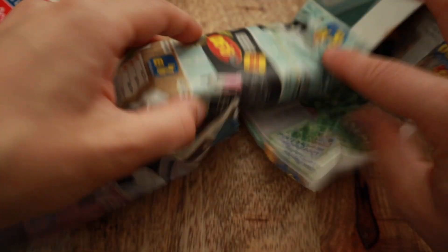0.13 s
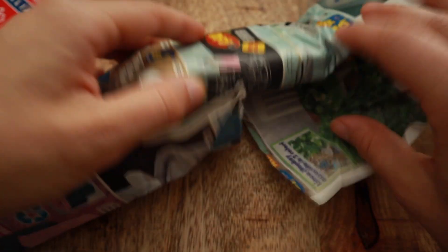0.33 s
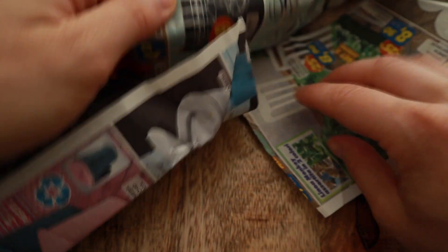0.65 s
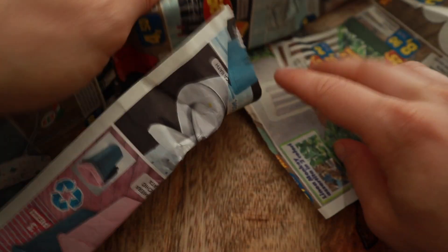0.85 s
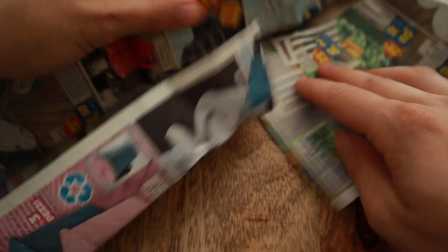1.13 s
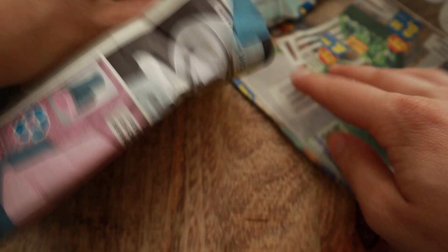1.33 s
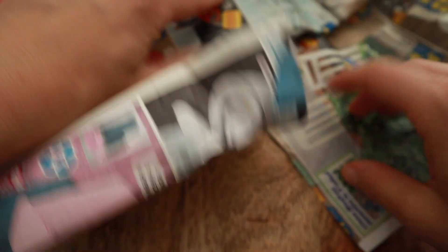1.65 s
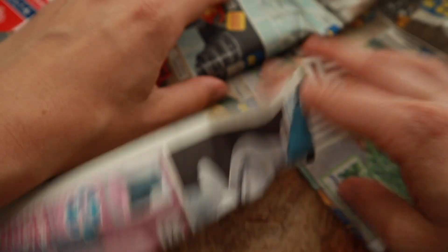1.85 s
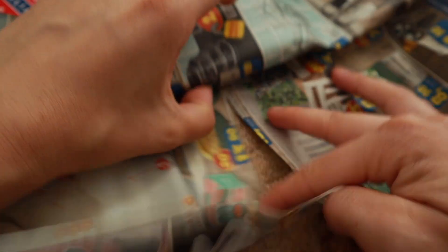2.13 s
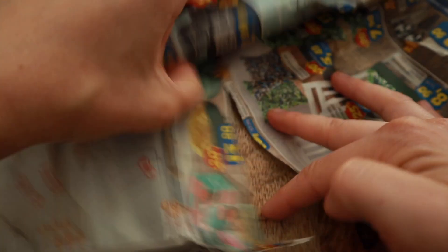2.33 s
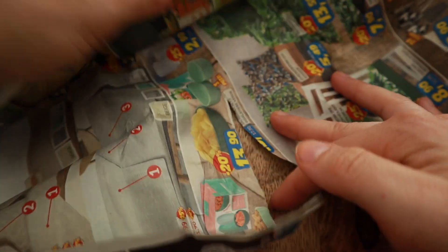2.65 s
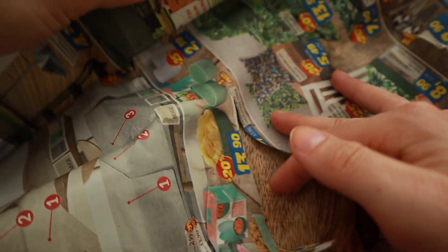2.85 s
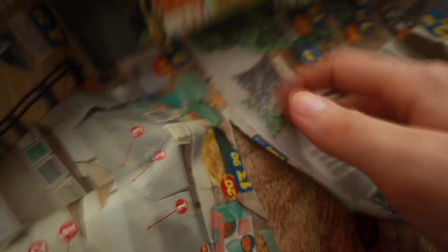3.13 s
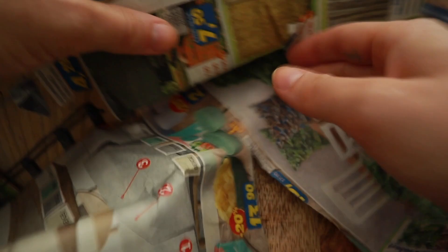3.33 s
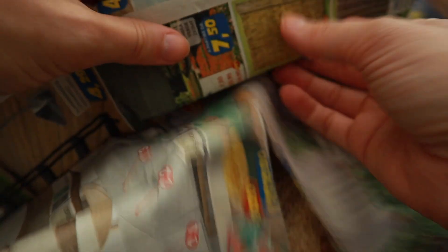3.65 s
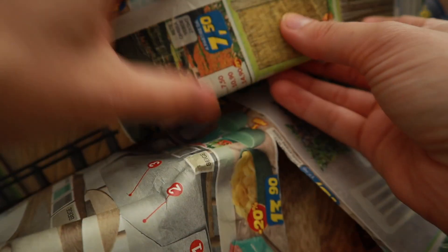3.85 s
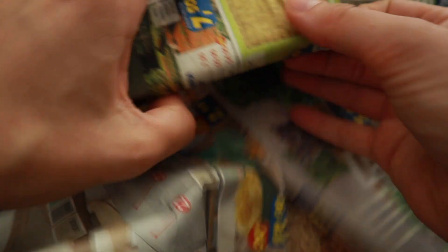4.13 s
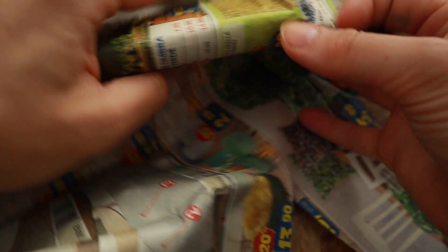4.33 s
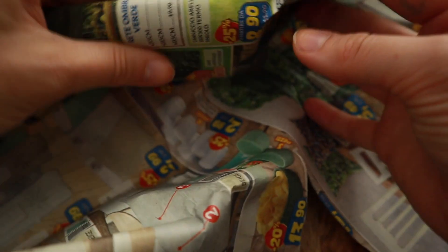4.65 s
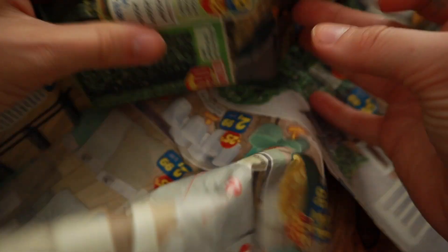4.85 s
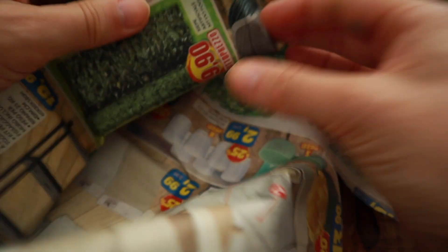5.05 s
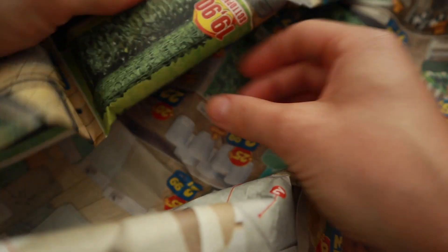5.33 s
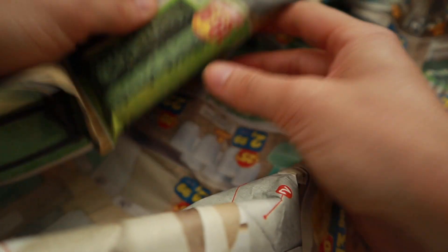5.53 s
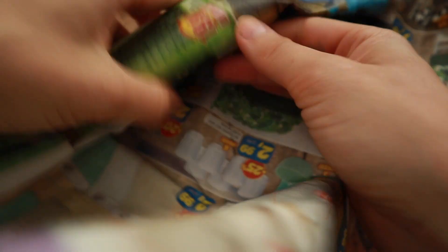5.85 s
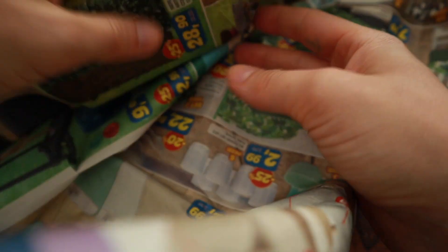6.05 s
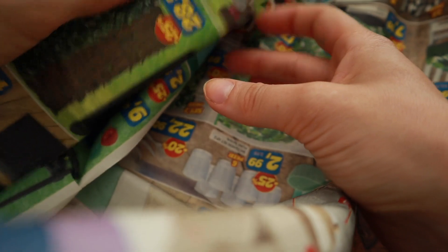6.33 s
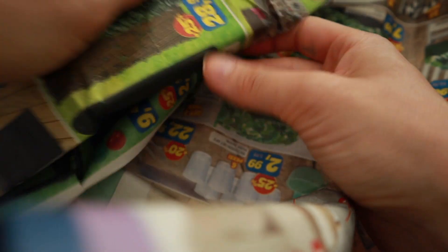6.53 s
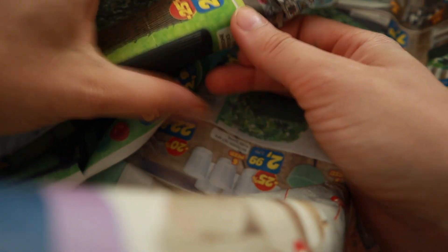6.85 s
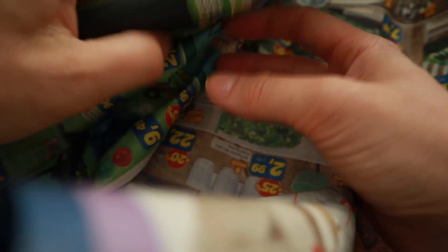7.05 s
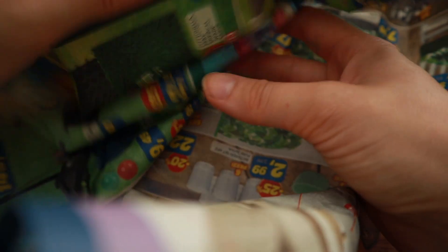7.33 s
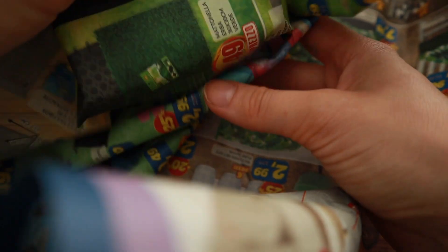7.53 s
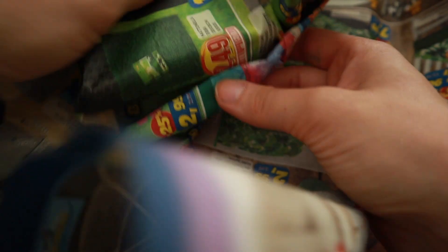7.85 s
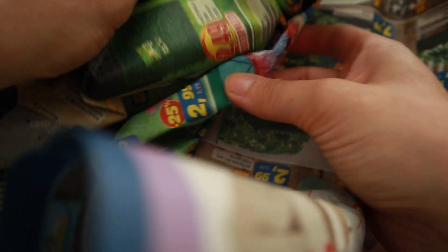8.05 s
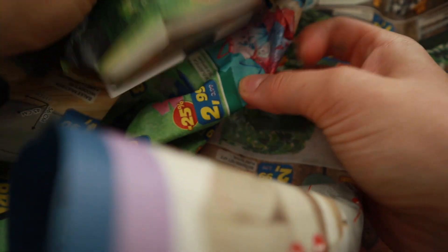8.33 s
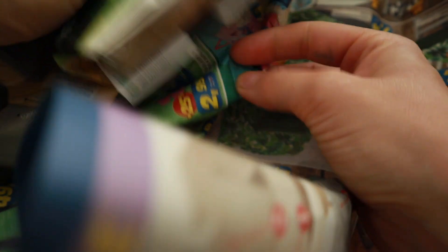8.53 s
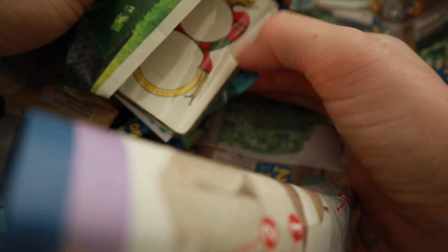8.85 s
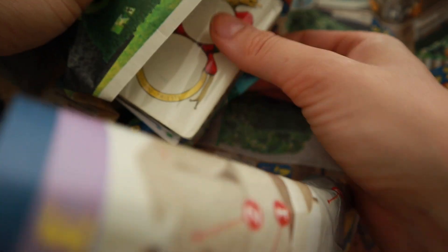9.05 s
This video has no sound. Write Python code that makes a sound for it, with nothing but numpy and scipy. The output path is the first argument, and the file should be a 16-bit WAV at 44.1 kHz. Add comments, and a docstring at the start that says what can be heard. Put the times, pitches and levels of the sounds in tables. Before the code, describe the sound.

Very close, in a small dry room, hands pull apart rolled glossy flyers over a wooden table. A brisk crinkle opens at 0 s, followed by light crackling and isolated bright ticks. At about 0.8 s a crisp snap coincides with a hollow pop and a dull table thud. Sparse pulls and near-quiet touches continue to 2 s, then short crinkles return around 2.2-2.6 s. From 2.8 s snaps come more often over uneven rubbing, with strong bursts near 3.6, 4.3 and 4.7-4.9 s. After a brief easing around 5.1 s, crackling becomes almost continuous. From 7 to 8.5 s larger panels buckle with deeper hollow pops, sharp snaps at 7.2, 7.9 and 8.4 s, and fizzing slides, especially near 8.5 s. It thins after 8.7 s, leaving faint air and a small final crinkle near 8.96 s.

```python
"""Two hands pull apart a bundle of rolled glossy flyers on a wooden table, heard close up in a small room.
Creases snap as ringing ticks, larger panels buckle with a hollow pop, and the sheets crackle and slide:
many tiny ringing facets over uneven rubbing noise, first in single moves, then almost without pause.
Filtered noise and slips add soft touches, small stray ticks, table handling, one thud and quiet air."""
import sys
import numpy as np
from scipy import signal
from scipy.io import wavfile
from scipy.ndimage import uniform_filter1d

SR = 44100
rng = np.random.default_rng(int(sys.argv[2]) if len(sys.argv) > 2 else 0)


def persist_wave(psi):
    """Save psi, clipped to +-1, as 16-bit WAV."""
    counts = np.round(np.clip(psi, -1, 1) * 32767).astype(np.int16)
    wavfile.write(sys.argv[1], SR, np.atleast_2d(counts).T)


N = 405279
TIME = np.arange(N) / SR


def amp(db):
    """Turns decibels into a gain."""
    return 10 ** (np.asarray(db) / 20)


def evened(x):
    """Scales a sound to an average (rms) strength of 1."""
    return x / np.sqrt(np.mean(x ** 2) + 1e-20)


def peaked(x, seconds):
    """Scales a sound so that its loudest stretch of this length has rms 1."""
    power = uniform_filter1d(x ** 2, max(int(seconds * SR), 1))
    return x / np.sqrt(power.max())


def read(points, hz):
    """Reads a spectrum table at these frequencies, with straight lines over log pitch."""
    table_hz, value = np.transpose(points)
    return np.interp(np.log(hz + 1), np.log(table_hz), value)


def follow(rows):
    """Draws straight lines through a table of times and levels, giving a level for every sample."""
    start_s, level_db = np.transpose(rows)
    return np.interp(TIME, start_s, level_db)


def add(mix, start_s, sound):
    """Mixes a sound in at a given time."""
    part = mix[max(round(start_s * SR), 0):][:len(sound)]
    part += sound[:len(part)]


def ring(x, hz, width):
    """Lets a force ring one damped resonance; a wider one [Hz] dies away sooner."""
    hz = min(hz, SR / 2 - 1000)
    sharpness = hz / min(width, SR / np.pi)
    b, a = signal.iirpeak(hz, sharpness, SR)
    return signal.lfilter(b, a, x)


def colour(x, points, size=4096):
    """Filters to a given spectrum without sounding ahead of the input, so that attacks stay sharp."""
    hz = abs(np.fft.fftfreq(size, 1 / SR))
    log_gain = np.log(amp(read(points, hz)))
    # the phase that packs the filter's energy as early as possible
    minimum_phase = np.exp(np.conj(signal.hilbert(log_gain)))
    taps = np.fft.ifft(minimum_phase).real[:size // 2]
    return signal.oaconvolve(x, taps)[:len(x)]


def hiss(lo_hz, hi_hz):
    """Makes smooth noise between two pitches."""
    band = [lo_hz, min(hi_hz, SR / 2 - 1)]
    sos = signal.butter(2, band, "band", fs=SR, output="sos")
    return evened(signal.sosfilt(sos, rng.standard_normal(N)))


def slips(per_s, spread_db):
    """Makes a random train of tiny slips, most weak and a few strong."""
    size = amp(spread_db * np.minimum(rng.exponential(1, N), np.pi))
    happens = rng.random(N) < per_s / SR
    return size * rng.choice([-1, 1], N) * happens


def burst(rise, linger=0.0014, linger_db=-20):
    """Force of a buckling: noisy slips swell and fade as the fold travels, then the sheet settles (times in s)."""
    t = np.arange(2 ** 10) / SR
    run = (t / rise * np.exp(1 - t / rise)) ** 2
    settling = amp(linger_db) * np.exp(-t / linger) * (t > rise)
    return (run + settling) * rng.standard_normal(len(t))


def tick(hz, width_hz=1450, overtone_db=-6, overtone_width_hz=200, broad_db=-27):
    """One facet rings: its main resonance and four chance ones; higher facets are damped faster."""
    force = burst(rise=.0012)
    width = width_hz * (hz / 4000) ** 1.3  # width_hz holds at 4000 Hz
    main = ring(ring(force, hz, width), hz, width)
    others = sum(ring(force, hz * ratio, overtone_width_hz) for ratio in 2 ** rng.uniform(-1, 1.3, 4))
    return main + amp(overtone_db) * others + amp(broad_db) * force


def grains(lo_hz, hi_hz, train, count=192):
    """Every slip of the train rings one of many facets between these pitches."""
    facets = [evened(tick(hz)) for hz in np.geomspace(lo_hz, hi_hz, count)]
    which, out = rng.integers(0, count, N), np.zeros(N)
    for at in np.flatnonzero(train):
        add(out, at / SR, train[at] * facets[which[at]])
    return evened(out)


def grip(depth_db=8.5, seconds=0.0092):
    """Sheets catch and let go, so the rubbing comes in short spurts."""
    size = max(int(seconds * SR), 1)
    wander = uniform_filter1d(uniform_filter1d(rng.standard_normal(N), size), size)
    return amp(depth_db * evened(wander))


def steadied(x, seconds=0.02, share=0.7):
    """Evens out chance clumps, so that a crackle keeps the strength of the pull behind it."""
    size = int(seconds * SR)
    power = uniform_filter1d(uniform_filter1d(evened(x) ** 2, size), size)
    return evened(x / (abs(power) + 1e-9) ** (share / 2))


def shifting(x, depth_db=4.0, patch_hz=430, patch_s=0.04):
    """The sheets bend as they move, so patches of pitch and time grow louder or softer at random."""
    hz, when, z = signal.stft(x, SR)
    field = rng.standard_normal(z.shape)
    for axis, size in enumerate([patch_hz / hz[1], patch_s / when[1]]):
        field = uniform_filter1d(field, max(round(size), 1), axis)
    return evened(signal.istft(z * amp(depth_db * evened(field)), SR)[1][:N])


def air(level_db=-75):
    """Quiet, steady low hiss of the air."""
    return amp(level_db) * hiss(145, 1440)


def echo(table_db=-11, tail_db=-10, t60_s=0.14):
    """Quick reflections off the table and the sheets, then a short tail that falls 60 dB in t60_s."""
    t = np.arange(SR // 2) / SR
    near = rng.standard_normal(len(t)) * (t > .002) * (t < .012) * (rng.random(len(t)) < 1 / 20)
    tail = rng.standard_normal(len(t)) * (t > .008) * amp(-60 * t / t60_s)
    return amp(table_db) * near / np.linalg.norm(near) + amp(tail_db) * tail / np.linalg.norm(tail)


def room(x, count=8):
    """The sound comes from ever changing spots on the paper, each with its own reflections."""
    block = 2 ** 10  # samples before a new spot is drawn
    spot = np.repeat(rng.integers(0, count, N // block + 1), block)[:N]
    out = x.copy()
    for k in range(count):
        share = uniform_filter1d(1. * (spot == k), 2 ** 7)  # soft change from spot to spot
        out += signal.oaconvolve(x * share, echo())[:N]
    return out


# how strongly each pitch comes through in the dull noise of hands and table
# columns: pitch_hz [Hz], level_db [dB, relative]
HANDLING_SPECTRUM = [(45, -32), (140, -4.5), (340, -4.5), (1200, -26)]


def handling(effort, level_db=-70.3, share=0.64):
    """Fingers and rolls bump and drag on the table in many dull slips, a little louder with effort."""
    drag = colour(slips(per_s=620, spread_db=2.5), HANDLING_SPECTRUM)
    return amp(level_db) * evened(effort ** share * drag)


# one roll bumps the table
# columns: start_s [s], level_db [dB, at its loudest]
TABLE_BUMP = (0.818, -52)


def bump(ring_s=0.0044):
    """A roll lands on the table with a dull thud: fading noise in the table's colour."""
    start_s, level_db = TABLE_BUMP
    out, t = np.zeros(N), np.arange(SR // 4) / SR
    thud = colour(np.exp(-t / ring_s) * rng.standard_normal(len(t)), HANDLING_SPECTRUM)
    add(out, start_s, amp(level_db) * peaked(thud, ring_s))
    return out


# every pull swells quickly, eases a little while it lasts, and dies away
RISE_DB_PER_S, SAG_DB, RELEASE_DB_PER_S = 2597, 2, 432


def stroke(start, hold):
    """Start time and strength of one movement: rise, sagging hold, release (times in s)."""
    t = np.arange(-min(start, .05), hold + .4, 1 / SR)
    sag_db = SAG_DB * (t > 0) * np.minimum(t / (hold + 1 / SR), 1)
    release_db = RELEASE_DB_PER_S * np.maximum(t - hold, 0)
    return start + t[0], amp(RISE_DB_PER_S * np.minimum(t, 0) - sag_db - release_db)


# a hand pulls at the paper; each sound it drives sets its own loudness on top
# columns: start_s [s], hold_s [s], crinkle_db [dB], flex_db [dB, bending of the roll relative to crinkle_db]
HAND_PULLS = [(0.0, 0.007, -35, -24.5), (0.113, 0.12, -50.5, -25), (0.499, 0.053, -47.5, -14.5),
              (0.812, 0.024, -39.5, -12), (1.057, 0.069, -53, -17), (1.154, 0.055, -46, -15.5),
              (1.521, 0.083, -51, -15), (1.87, 0.27, -62.5, -42), (2.175, 0.059, -47.5, -16.5),
              (2.317, 0.11, -48.5, -15.5), (2.412, 0.02, -48, -8), (2.59, 0.047, -45, -16),
              (2.831, 0.015, -45, -15.5), (3.055, 0.13, -44, -20), (3.222, 0.27, -51.5, -18.5),
              (3.539, 0.34, -55, -18), (3.623, 0.0061, -38, -13), (4.154, 0.24, -53.5, -16),
              (4.268, 0.054, -39.5, -18), (4.397, 0.24, -43.5, -16), (4.661, 0.0063, -35, -17),
              (4.872, 0.0098, -33.5, -14.5), (5.249, 0.055, -43, -18), (5.49, 0.026, -45, -15),
              (5.703, 0.038, -40.5, -14.5), (5.973, 0.079, -41, -12), (6.282, 0.027, -39, -14.5),
              (6.401, 0.072, -43.5, -11.5), (6.507, 0.0033, -34, -6.5), (6.931, 0.032, -42.5, -8.5),
              (7.043, 0.11, -46, -12.5), (7.18, 0.023, -35, -15), (7.298, 0.18, -49, -4.5),
              (7.392, 0.023, -41, -12.5), (7.596, 0.01, -48.5, -1.5), (7.659, 0.083, -52.5, -2),
              (7.831, 0.035, -52.5, -2.5), (7.934, 0.039, -47, 0), (8.185, 0.09, -43, -12.5),
              (8.382, 0.11, -43, -7.5), (8.572, 0.12, -43.5, -12.5), (8.958, 0.0097, -45.5, -22.5)]
# fizz of gloss sliding on gloss
# columns: start_s [s], level_db [dB, relative to the crinkling]
GLOSS_SLIDE = [(2.85, -6), (4.7, -8), (6.4, -3.5), (7.4, 2), (7.8, -10), (8.5, 6.5), (8.95, -16)]
# faint rustle of the paper held between pulls, before each sound's own loudness
# columns: start_s [s], level_db [dB]
HELD_PAPER = [(0.0, -63.5), (0.3, -69.5), (0.95, -72.5), (1.28, -65.5), (1.8, -77), (2.9, -66.5),
              (4.08, -71.5), (4.75, -57), (4.98, -61.5), (5.87, -64), (6.6, -61.5), (8.66, -60.5),
              (8.79, -81.5)]


def hands(idle_flex_db=-15):
    """Strength of crinkling, flexing, sliding and idle touch: the pulls add to the rustle of held paper."""
    # powers add up here; the square root at the end turns them back into strengths
    idle = amp(follow(HELD_PAPER)) ** 2
    pull, flex = np.zeros((2, N))
    for start_s, hold_s, crinkle_db, flex_db in HAND_PULLS:
        start, shape = stroke(start_s, hold_s)
        add(pull, start, (amp(crinkle_db) * shape) ** 2)
        add(flex, start, (amp(crinkle_db + flex_db) * shape) ** 2)
    crinkle = pull + idle
    flex = flex + amp(idle_flex_db) ** 2 * idle
    slide = amp(follow(GLOSS_SLIDE)) ** 2 * crinkle
    return np.sqrt([crinkle, flex, slide, idle])


def brush(idle, level_db=-1.0):
    """Fingertips brush over the held paper in soft, uneven touches."""
    touches = hiss(376, 1690) * grip(depth_db=2.5, seconds=0.024)
    return amp(level_db) * idle * shifting(touches)


# how strongly the paper gives off each pitch; also colours the crackle, pops and snaps below
# columns: pitch_hz [Hz], level_db [dB, relative]
SHEET_SPECTRUM = [(200, -35.5), (620, 9), (1650, -5), (2300, 4.5), (2750, -4.5), (3450, 1), (5600, -4.5),
                  (8800, 0), (11000, -4.5), (15500, -10.5)]


def strays(level_db=-3, per_s=22):
    """Held paper gives off small single ticks at many pitches."""
    ticks = grains(1800, 7000, slips(per_s, spread_db=2))
    return amp(level_db + follow(HELD_PAPER)) * evened(colour(ticks, SHEET_SPECTRUM))


def crackle(lo_hz, hi_hz, train, rub_db, uneven_db=4):
    """Small facets tick at every slip with varied pitch and strength, over the uneven rub of sheet on sheet."""
    ticks = grains(lo_hz, hi_hz, train * amp(uneven_db * rng.standard_normal(N)))
    rub = amp(rub_db) * evened(hiss(lo_hz, hi_hz) * grip())
    return steadied(shifting(colour(ticks + rub, SHEET_SPECTRUM)))


def rustle(effort, flex, slide, fine_db=-3.5, coarse_db=0.5, flex_db=5.0, slide_db=-7.5, flex_share=0.76):
    """Crinkling, the fizz of sliding gloss and the hollow flexing of the rolls, all driven by the hands."""
    low_hz, split_hz, middle_hz, high_hz = 1450, 3200, 7200, 16000
    train = slips(per_s=520, spread_db=4.5)
    fine = effort * crackle(split_hz, middle_hz, train, rub_db=7)
    fizz = slide * crackle(middle_hz, high_hz, train, rub_db=-32.0)
    # wide facets only crinkle strongly when the roll bends as well
    bending = effort ** (1 - flex_share) * flex ** flex_share
    coarse = bending * crackle(low_hz, split_hz, train, rub_db=3.5)
    # large panels knock at changing pitches, heard through the hollow of the rolls
    knocks = grains(414, low_hz, slips(per_s=200, spread_db=7.0))
    hollow = flex * steadied(shifting(colour(ring(knocks, hz=840, width=560), SHEET_SPECTRUM)))
    return amp(fine_db) * fine + amp(coarse_db) * coarse + amp(slide_db) * fizz + amp(flex_db) * hollow


# a larger panel of a roll buckles
# columns: start_s [s], level_db [dB, peak before the lift all pops share], pitch_hz [Hz]
PANEL_POPS = [(0.053, -56.5, 640), (0.821, -41, 760), (2.214, -53, 770), (2.482, -53.5, 686),
              (2.61, -47, 750), (3.067, -49, 800), (3.174, -45.5, 830), (3.634, -50.5, 740),
              (4.415, -45, 766), (4.466, -41.5, 830), (4.555, -42, 700), (4.785, -45, 704),
              (4.865, -41, 900), (4.878, -38.5, 1140), (5.488, -40.5, 640), (5.583, -44.5, 1130),
              (6.312, -44, 930), (6.416, -44.5, 775), (6.458, -44.5, 890), (6.523, -43.5, 700),
              (7.05, -37, 640), (7.085, -42, 795), (7.382, -38, 766), (7.659, -36.5, 850), (7.94, -36, 714),
              (8.21, -39, 770), (8.386, -43, 1180), (8.432, -37.5, 804), (8.501, -41.5, 960)]


def pops(lift_db=2.5, width_hz=260, shudder_db=-13, shudder_s=0.0086):
    """A panel flips over, rings the hollow of its roll for a few cycles and shudders to rest."""
    out, t = np.zeros(N), np.arange(SR // 10) / SR
    for start_s, level_db, pitch_hz in PANEL_POPS:
        flip = burst(rise=0.0015, linger_db=-36)
        shudder = np.exp(-t / shudder_s) * rng.standard_normal(len(t))
        for force, part_db in (flip, 0), (shudder, shudder_db):
            hollow = ring(ring(force, pitch_hz, width_hz), pitch_hz, pitch_hz)
            panel = peaked(colour(hollow, SHEET_SPECTRUM), 180 / SR)
            add(out, start_s, amp(level_db + lift_db + part_db) * panel)
    return out


def fold(hz, db):
    """One facet's tick in the colour of the paper, set to a peak level."""
    return amp(db) * peaked(colour(tick(hz), SHEET_SPECTRUM), 66 / SR)


# a crease snaps through
# columns: start_s [s], level_db [dB, peak of the main tick], pitch_hz [Hz, of the facet]
CREASE_SNAPS = [(0.16, -43, 4700), (0.212, -46.5, 4800), (0.354, -58, 5430), (0.504, -34.5, 6130),
                (0.644, -39, 5670), (0.684, -52.5, 3400), (0.82, -35, 2700), (0.971, -44, 7500),
                (1.536, -34.5, 5600), (1.724, -48.5, 6000), (1.902, -49.5, 5600), (2.035, -55.5, 4700),
                (2.17, -37.5, 3600), (2.375, -42.5, 6140), (2.782, -36.5, 5000), (2.838, -33.5, 4900),
                (3.019, -35.5, 6250), (3.084, -38, 4000), (3.136, -39.5, 5560), (3.174, -42, 5300),
                (3.262, -41, 5740), (3.459, -45, 3900), (3.647, -32.5, 5570), (3.851, -38.5, 5330),
                (3.992, -35, 3660), (4.127, -36.5, 5080), (4.209, -34, 5180), (4.32, -38, 3640),
                (4.361, -36.5, 5440), (4.51, -31, 4830), (4.658, -35, 5140), (4.741, -37, 3460),
                (4.88, -32.5, 3860), (5.009, -45, 4000), (5.093, -46.5, 5830), (5.165, -48.5, 7900),
                (5.207, -45, 5200), (5.347, -47, 2460), (5.402, -35, 5650), (5.444, -43.5, 6000),
                (5.497, -39, 5600), (5.554, -38, 4950), (5.584, -36.5, 3220), (5.647, -32.5, 5760),
                (5.704, -33, 3040), (5.824, -44, 3620), (5.908, -36, 6250), (5.92, -33.5, 3600),
                (6.046, -32, 4460), (6.098, -34, 6000), (6.211, -38, 3610), (6.304, -33.5, 4800),
                (6.417, -35.5, 5900), (6.508, -32.5, 5500), (6.664, -34, 2680), (6.715, -37.5, 4550),
                (6.825, -40, 4060), (6.994, -35, 4630), (7.089, -37.5, 5530), (7.186, -33.5, 4800),
                (7.22, -28.5, 2900), (7.412, -35, 3900), (7.469, -33, 6860), (7.56, -36, 3200),
                (7.593, -32.5, 6700), (7.657, -34, 3440), (7.749, -41.5, 5100), (7.896, -35.5, 5800),
                (7.939, -29, 3000), (7.999, -40, 4160), (8.157, -32.5, 4900), (8.209, -31.5, 5140),
                (8.267, -33.5, 3400), (8.387, -30.5, 5100), (8.433, -39, 6940), (8.442, -28.5, 5150),
                (8.5, -35, 4570), (8.527, -34, 6100), (8.653, -36.5, 4400), (8.825, -55, 1880)]


def snaps(lead_db=-11, lead_s=0.0015, after_db=-13, after_s=0.016,
          settle_db=-16, settle_width_hz=6000, count=3):
    """A crease starts to give, snaps, sets off weaker ticks in its neighbours and settles around its pitch."""
    out, t = np.zeros(N), np.arange(SR // 10) / SR
    for start_s, level_db, pitch_hz in CREASE_SNAPS:
        # half a millisecond early, as the tick takes a moment to swell
        add(out, start_s - .0005, fold(pitch_hz, level_db))
        # the other ticks lie up to half an octave higher or lower
        early, octave = rng.random(2)
        add(out, start_s - lead_s * (1 + early), fold(pitch_hz * 2 ** (octave - .5), level_db + lead_db))
        for delay, octave in rng.random((count, 2)):
            add(out, start_s + after_s * delay, fold(pitch_hz * 2 ** (octave - .5), level_db + after_db))
        # the facet rustles briefly after the snap
        settle = ring(rng.standard_normal(len(t)), pitch_hz, settle_width_hz)
        settle = evened(colour(ring(settle, pitch_hz, settle_width_hz), SHEET_SPECTRUM))
        add(out, start_s, amp(level_db + settle_db - RELEASE_DB_PER_S * t) * settle)
    return out


def scene():
    """The paper in the room, with the table and the quiet air added directly."""
    effort, flex, slide, idle = hands()
    paper = snaps() + pops() + strays() + rustle(effort, flex, slide) + brush(idle)
    table = handling(np.hypot(flex, idle / 2)) + bump()
    return (room(paper) + table + air())[None]


def record(dry, edge_hz=15900):
    """Cuts off everything above the highest pitch that gets through."""
    taps = signal.firwin(401, edge_hz, window=("kaiser", 8), fs=SR)
    return signal.oaconvolve(dry, taps[None], "same")


dry = scene()
out = record(dry)
persist_wave(out)
```